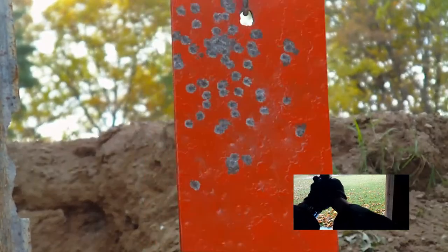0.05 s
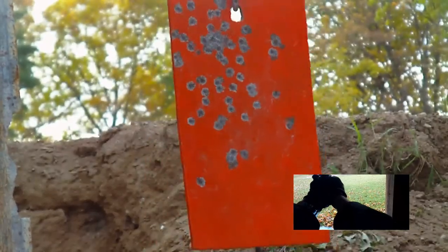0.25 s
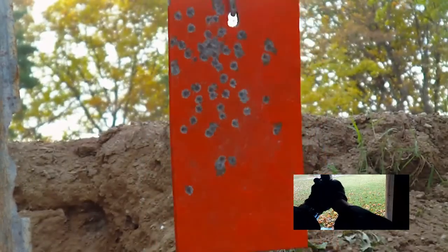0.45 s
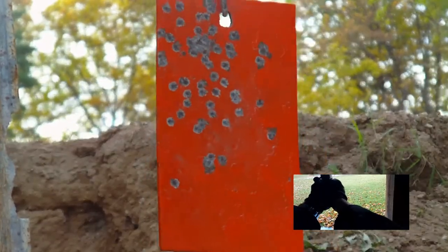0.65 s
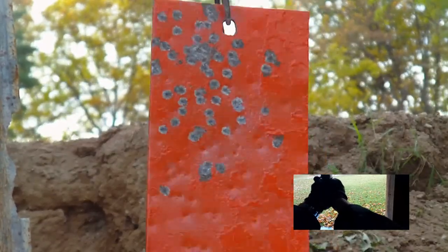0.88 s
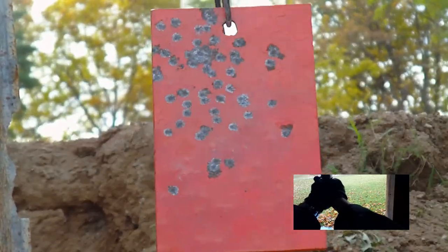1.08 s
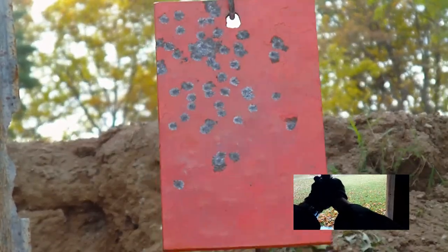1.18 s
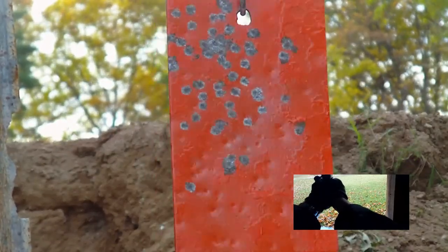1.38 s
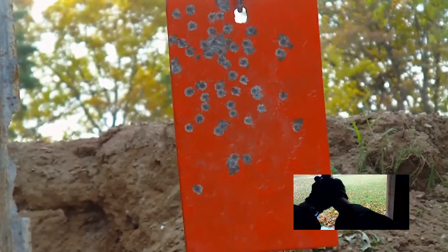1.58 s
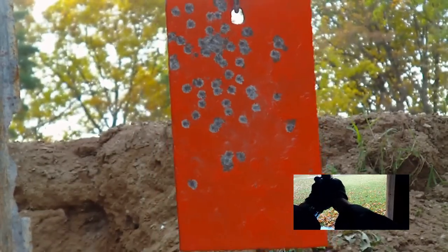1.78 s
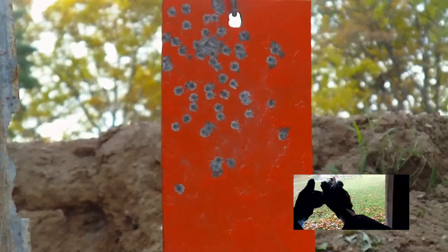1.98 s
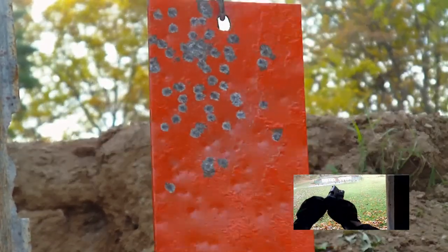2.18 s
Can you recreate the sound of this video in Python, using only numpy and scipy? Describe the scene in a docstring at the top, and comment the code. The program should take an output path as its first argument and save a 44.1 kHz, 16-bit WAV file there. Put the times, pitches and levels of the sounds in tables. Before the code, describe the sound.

Single rifle-like shot, instantly followed by a bright metallic clang on steel, then a woodland echo tail

```python
"""Air with leaves and far traffic is heard first, over a steel plate's hum and a soft knock on the camera.
Outdoors, a small-calibre muzzle blast then overloads the microphone, a short pulse with close echoes; the bullet
clangs on the hanging plate, a sum of damped modes, and the report rolls away among trees and earth banks as
dying noise. Brass and grit tick as short damped rings. The camera's gain control ducks at the shot, holds
and creeps back up, lifting the air and the hum."""
import sys
import numpy as np
from scipy import signal
from scipy.fft import rfft, irfft, next_fast_len
from scipy.io import wavfile
from scipy.ndimage import uniform_filter1d, minimum_filter1d, map_coordinates

SR = 44100
rng = np.random.default_rng(int(sys.argv[2]) if len(sys.argv) > 2 else 0)


def gain_from_decibels(decibels):
    """Convert decibel values to linear amplitude factors."""
    exponent = np.asarray(decibels, float) / 20
    return 10 ** exponent


def wav_out(sig):
    """Save sig, one row per channel (or a flat mono array), as 16-bit PCM at SR to the path in sys.argv[1]."""
    wavfile.write(sys.argv[1], SR, np.round(np.clip(np.atleast_2d(sig).T, -1, 1) * 32767).astype(np.int16))


N = 99225
T = np.arange(N) / SR


def unit(x):
    """Normalisation to an rms of 1."""
    return x / np.sqrt(np.mean(x ** 2) + 1e-20)


def along(points, hz):
    """Interpolation of (frequency, value) points on a logarithmic frequency axis."""
    f, v = np.transpose(points)
    return np.interp(np.log(hz + 1), np.log(f + 1), v)


def filtered(x, response):
    """Linear filtering: the spectrum is multiplied by a response of frequency."""
    size = next_fast_len(N + SR // 2)
    spectrum = rfft(x, size) * response(np.fft.rfftfreq(size, 1 / SR))
    return irfft(spectrum, size)[..., :N]


def noise(colour):
    """Coloured noise of rms 1: white noise shaped by a spectral density."""
    return unit(filtered(rng.standard_normal(N), lambda hz: gain_from_decibels(along(colour, hz))))


def fade(start_s, t60, rise_s, power=1):
    """Decay law: silence, a quick rise, then a fall of 60 dB in t60, quickening if power exceeds 1."""
    t = np.maximum(T - start_s, 0)
    return gain_from_decibels(-60 * (t / t60) ** power) * (1 - np.exp(-t / rise_s))


def ring(start_s, hz, t60, turn=0, power=1):
    """Damped vibration of one mode: a cosine, its phase in turns, under a decay."""
    return fade(start_s, t60, .00006, power) * np.cos(2 * np.pi * (hz * (T - start_s) + turn))


def roll(colour, t60s, rise_s, start_s):
    """Diffuse decay: in dying noise each frequency falls at its own speed, in uneven patches."""
    patchy_db = 1.2
    hz, t, bins = signal.stft(noise(colour), SR, nperseg=256)
    across_hz = uniform_filter1d(rng.standard_normal(bins.shape), 8, 0)
    patches = unit(uniform_filter1d(across_hz, 6, 1))
    fall_db = -60 * np.maximum(t - start_s, 0) / along(t60s, hz)[:, None]
    dying = signal.istft(bins * gain_from_decibels(fall_db + patchy_db * patches), SR, nperseg=256)[1][:N]
    return dying * fade(start_s, 1e9, rise_s)


def outdoor_air():
    """Broadband ambience: leaves and far traffic as coloured noise that wavers slightly in level."""
    # Spectrum of the air: (frequency [Hz], relative density [dB per Hz])
    air_colour = [(15, -42), (25, -1), (212, -2.5), (588, -7.5), (668, -14.5), (740, -18.5), (1670, -11),
                  (7900, -26), (9930, -31.5), (11000, -39.5), (14300, -70), (22000, -120)]
    air_db, notch_hz, notch_wide_hz = -55, 7850, 253
    gusts = map_coordinates(rng.standard_normal(40), [T * 5])
    # a dark band in the hiss
    air = filtered(noise(air_colour), lambda hz: 1 - np.exp(-((hz - notch_hz) / notch_wide_hz) ** 2))
    return gain_from_decibels(air_db + 0.4 * gusts) * air


def plate_hum():
    """Sustained vibration of the plate's lowest mode: one sine under a slowly varying level."""
    # Level of the hum: (time [s], level [dB])
    hum_level = [(0, -52), (.1, -46.5), (.19, -40), (.23, -52), (.6, -53.5), (1.1, -66), (1.7, -63.5),
                 (2.25, -62.5)]
    hum_hz = 671
    return gain_from_decibels(np.interp(T, *np.transpose(hum_level))) * np.sin(2 * np.pi * hum_hz * T)


def camera_knocks():
    """Impulse response of a damped body: soft knocks on the camera ring low, with a rounded onset."""
    # Knocks: (time [s], level before the lift below [dB])
    knocks = [(0.03, -51.5), (.044, -48.5)]
    lift_db, knock_hz, knock_t60_s, rise_s = 22, 110.3, .14, .003
    total = sum(gain_from_decibels(db) * ring(s, knock_hz, knock_t60_s, turn=.873) * fade(s, 1e9, rise_s)
                for s, db in knocks)
    return gain_from_decibels(lift_db) * total


def brass_and_grit():
    """Impact excitation: each small landing is a damped tone with a crack of noise."""
    # Landings: (time [s], level before the lift below [dB], pitch [Hz], ring t60 [s], crack over ring [dB])
    landings = [(.12, -68, 4100, .09, -20), (.36, -44, 4470, .3, -12), (.361, -44, 5076, .12, -15),
                (.764, -50, 3600, .005, -26), (.773, -47, 3700, .004, -22), (.8065, -47, 3500, .004, -28),
                (1.523, -59, 868, .15, -14), (1.523, -61, 1058, .12, -14), (1.566, -51, 3250, .04, -4),
                (1.567, -51, 2300, .012, -10), (1.569, -61, 5380, .04, -6), (1.607, -66, 5380, .14, -10),
                (1.671, -58, 3000, .005, -3)]
    lift_db, crack_t60_s = 11, .018
    total = np.zeros(N)
    for s, db, hz, t60, crack_db in landings:
        crack = fade(s, crack_t60_s, .0003) * rng.standard_normal(N)
        total += gain_from_decibels(db) * (ring(s, hz, t60) + gain_from_decibels(crack_db) * crack)
    return gain_from_decibels(lift_db) * total


def swelling_hiss():
    """Amplitude modulation of coloured noise: a hiss swells ahead of the shot."""
    # Level of the hiss: (time [s], level [dB])
    swell = [(.165, -90), (.175, -60.5), (.196, -56.5), (.203, -41.5), (.2255, -33.5), (.23, -76)]
    # Spectrum of the hiss: (frequency [Hz], relative density [dB per Hz])
    swell_colour = [(59, -27), (100, 2.5), (2570, -8), (3520, -12.5), (9220, -5), (11000, -11),
                    (14300, -48.5), (22000, -120)]
    return gain_from_decibels(np.interp(T, *np.transpose(swell), left=-150, right=-150)) * noise(swell_colour)


def blast(start_s, up):
    """Pressure pulse: push, suck, push, a little over one swing of air; up scales its pitch and shortens it."""
    swing_hz, length_s = 435, .0025  # swing before the drift below; both at up = 1
    square = 2.5  # how hard the capsule flattens the blast
    t = np.clip(up * (T - start_s), 0, 5 * length_s)
    early = .07 * np.exp(-(t / .0007 - 1) ** 2)  # turns: the suck arrives early
    drift = .05 * t / length_s  # turns: the swing is slightly slowed
    swing = np.cos(2 * np.pi * (swing_hz * t + early - drift))
    dent = 1 - .3 * np.exp(-(t / .0003 - 1) ** 2)  # a brief dip in level during the first push
    return (t > 0) * np.exp(-(t / length_s) ** 4) * np.tanh(square * swing) * dent


def gun():
    """Direct sound, discrete reflections and diffuse scattering: the muzzle blast and its roll."""
    # Nearby surfaces: (delay [s], level over the blast [dB], sign, pitch over the blast's [ratio])
    reflections = [(.0045, -21, -1, 1.3), (.0079, -8, -1, 3.6), (.0087, -13, -1, 1.7), (.0098, -10, 1, 1.5),
                   (.011, -15, 1, 1.4), (.014, -23, 1, 1.1), (.016, -25, -1, 1.2)]
    # Decay of the scatter close by, then of the woods: (frequency [Hz], t60 [s])
    near_t60 = [(100, .2), (400, 0.34), (2000, 0.18), (6000, 0.14), (10000, 0.096)]
    far_t60 = [(100, 1.7), (400, 2.67), (1500, 2.3), (4000, 1.2), (7000, 0.91), (10000, 0.14)]
    # Spectra of the two rolls: (frequency [Hz], relative density [dB per Hz])
    near_colour = [(30, -31), (250, -4.5), (600, -9.5), (1500, -14.5), (4000, -15), (10000, -20.5),
                   (14000, -69.5)]
    far_colour = [(24, -104), (40, -57), (184, -9.5), (419, -3), (2120, -12.5), (2390, -10), (2810, -11.5),
                  (8700, -23.5), (11000, -52.5), (14300, -74), (22000, -120)]
    shot_s, shot_db, near_db, far_db = .2261, 11.5, -11, -29.5
    snap_db, snap_t60_s = -15, .022  # noise, its level relative to the blast
    snap = gain_from_decibels(snap_db) * fade(shot_s, snap_t60_s, .000067) * rng.standard_normal(N)
    direct = blast(shot_s, 1) + snap
    echoes = sum(sign * gain_from_decibels(db) * blast(shot_s + s, up) for s, db, sign, up in reflections)
    near = gain_from_decibels(near_db) * roll(near_colour, near_t60, .002, shot_s)
    far = gain_from_decibels(far_db) * roll(far_colour, far_t60, .02, shot_s)
    return gain_from_decibels(shot_db) * (direct + echoes) + near + far


def phase_waver():
    """Phase modulation by the swinging plate: a random wander, in turns."""
    return .055 * map_coordinates(rng.standard_normal(200), [T * 60], order=1)


def steel_modes(hit_s):
    """Modal superposition: each steel mode decays fast at first, then faintly on in a slow second stage."""
    # Modes of the plate: (frequency [Hz], level before the strike's own level [dB], t60 [s])
    modes = [(867, -12, .24), (1058, -19, .3), (1665, -31, .9), (2334, -12, .46), (2449, -13, .28),
             (2664, -11, .34), (2966, -9, .26), (3702, -8, .24), (3935, -16, .26), (4109, -7, .11),
             (4285, -19, .3), (4462, -12, .1), (5076, -16, .14), (5408, -10, .18), (5824, 0, .125),
             (6783, -15, .15), (6887, -15, .17), (7240, -13, .23), (7943, -9, .14), (8506, -17, .29),
             (8643, -7, .19), (9300, 0, .14), (9512, -27, .3), (10312, -14, .16), (10490, -15, .08)]
    linger_db, linger_tilt_db_per_khz, linger_longer = -27, -1.6, 3  # linger_db holds at 4.5 kHz
    steepens = 1.5  # the decay in dB grows as time to this power
    total = np.zeros(N)
    for hz, db, t60 in modes:
        first_turn, second_turn = rng.random(2)
        first = ring(hit_s, hz, t60, first_turn + phase_waver(), steepens)
        second = ring(hit_s, hz, t60 * linger_longer, second_turn + 3 * phase_waver(), steepens)
        second_db = linger_db + linger_tilt_db_per_khz * (hz / 1000 - 4.5)
        total += gain_from_decibels(db) * (first + gain_from_decibels(second_db) * second)
    return total


def plate_strike():
    """Impact on an elastic plate: the lead splashes as bright noise and the steel rings in many modes."""
    # Faint modes too dense to count, their decay: (frequency [Hz], t60 [s])
    sizzle_t60 = [(2000, .45), (5000, 0.35), (7000, .3), (8500, .15), (10500, 0.13)]
    # and their spectrum: (frequency [Hz], relative density [dB per Hz])
    sizzle_colour = [(1200, -28), (2500, -0.5), (5000, -3), (7500, -2.5), (10000, -7), (11000, -32)]
    hit_s, modes_db, sizzle_db = .2453, -9.5, -17.5
    splash_db, splash_t60_s, splash_hz = -5, .03, 1827
    bright = unit(filtered(rng.standard_normal(N), lambda hz: hz ** 2 / (hz ** 2 + splash_hz ** 2)))
    splash = gain_from_decibels(splash_db) * bright * fade(hit_s, splash_t60_s, .00034)
    sizzle = gain_from_decibels(sizzle_db) * roll(sizzle_colour, sizzle_t60, .0005, hit_s)
    return gain_from_decibels(modes_db) * steel_modes(hit_s) + splash + sizzle


def scene():
    """Superposition, nearly mono: partial decorrelation sets the channels apart, mostly in the treble."""
    # Stereo difference: (frequency [Hz], side over mid [dB])
    side_level = [(60, -33), (500, -38), (2000, -24.5), (5000, -9.5), (10000, -19.5)]
    mid = outdoor_air() + plate_hum() + camera_knocks() + brass_and_grit() + gun() + plate_strike()
    smear = rng.standard_normal(SR // 200) * gain_from_decibels(-np.linspace(0, 30, SR // 200))  # 5 ms of dying noise
    smeared = signal.fftconvolve(mid, smear / np.linalg.norm(smear))[:N]
    side = filtered(smeared, lambda hz: gain_from_decibels(along(side_level, hz)))
    return np.array([mid + side, mid - side])


def gain_control(x):
    """Automatic level regulation: the gain ducks fast, holds, and recovers at a steady rate."""
    start_gain_db, duck_above_db, deepest_db = -9, -35.5, -10.5
    duck_s, hold_s, recover_db_per_s = .004, .97, 11.5
    span, hold = round(duck_s * SR), round(hold_s * SR)
    # each window ends at the present sample
    power = uniform_filter1d(x.mean(0) ** 2, span, origin=(span - 1) // 2)
    level_db = 10 * np.log10(np.abs(power) + 1e-12)
    wanted_db = np.clip(duck_above_db - level_db, deepest_db, 0)
    held_db = minimum_filter1d(wanted_db, hold, origin=(hold - 1) // 2)
    # the gain starts low, already recovering
    recovery_db = recover_db_per_s * T
    held_db = np.minimum(held_db, start_gain_db + recovery_db)
    gain_db = np.minimum.accumulate(held_db - recovery_db) + recovery_db
    return x * gain_from_decibels(uniform_filter1d(gain_db, span, origin=(span - 1) // 2))


def overload(x):
    """Saturation: a steep-kneed curve bends peaks towards a ceiling of 0.97."""
    return x / (1 + np.abs(x / .97) ** 8) ** (1 / 8)


def roll_off(x):
    """The treble ends steeply here."""
    return signal.sosfilt(signal.butter(12, 11350, fs=SR, output="sos"), x)


def record(dry):
    """Transducer chain: low cut, gain control, own hiss and overload; then a hiss that swells ahead of the shot
    joins, and a band limit."""
    low_cut_hz, hiss_db, top_hz = 150, -97, 10600
    x = filtered(dry, lambda hz: 1j * hz / (low_cut_hz + 1j * hz))
    x = gain_control(x) + gain_from_decibels(hiss_db) * rng.standard_normal(N)
    x = overload(x) + swelling_hiss()
    finished = filtered(x, lambda hz: 1 / (1 + (hz / top_hz) ** 60))
    return roll_off(finished)


dry = scene()
out = record(dry)
wav_out(out)
```